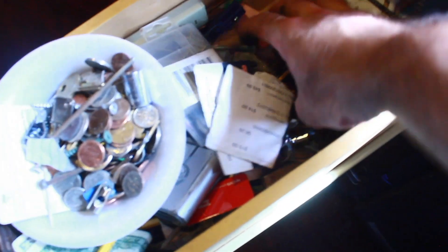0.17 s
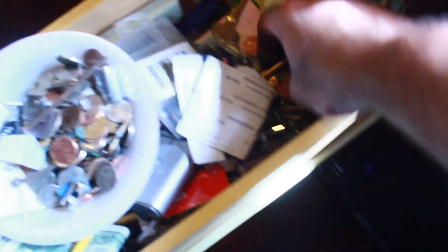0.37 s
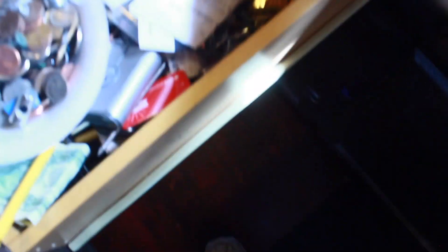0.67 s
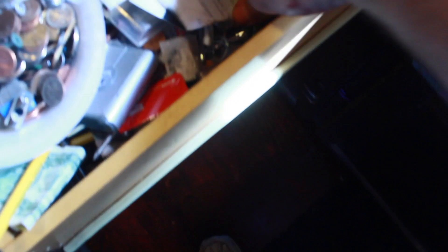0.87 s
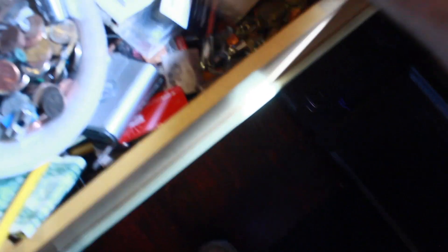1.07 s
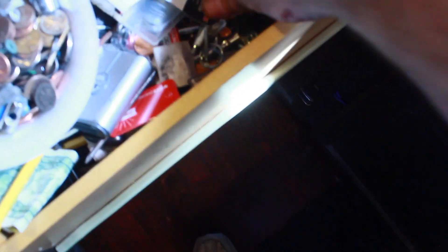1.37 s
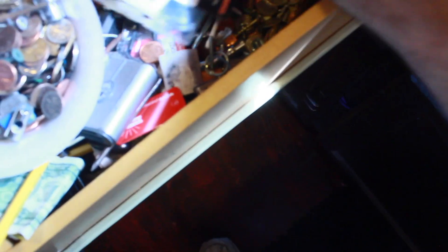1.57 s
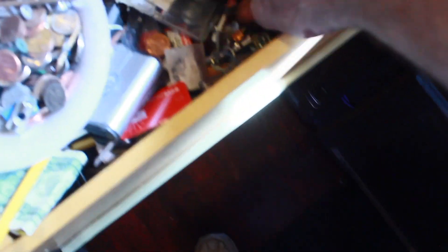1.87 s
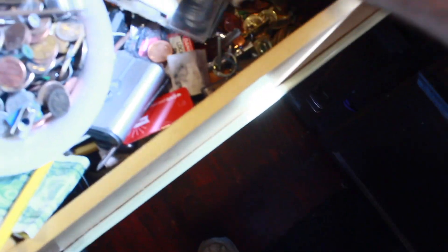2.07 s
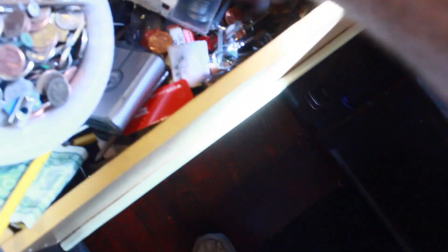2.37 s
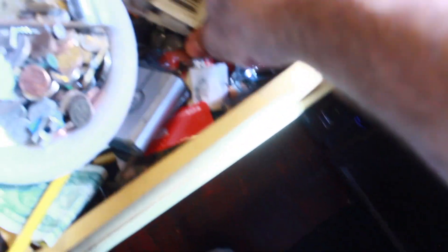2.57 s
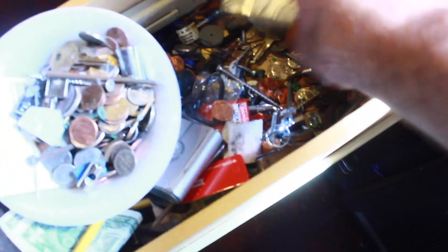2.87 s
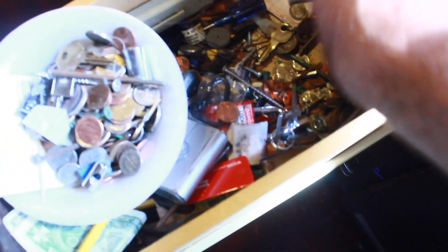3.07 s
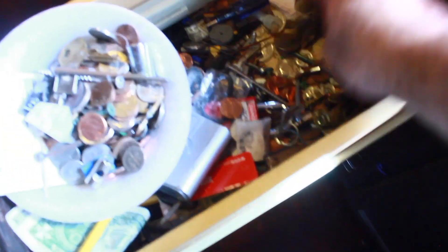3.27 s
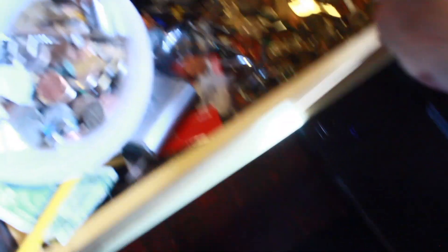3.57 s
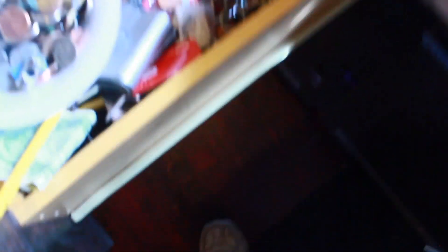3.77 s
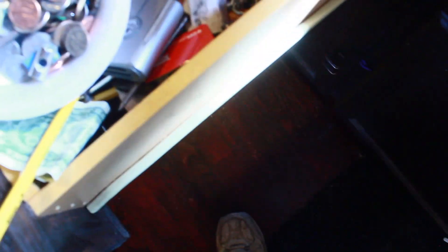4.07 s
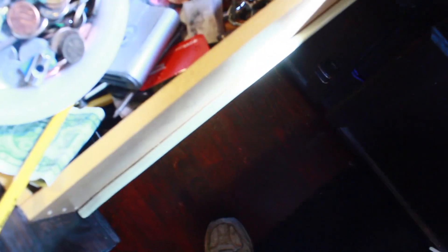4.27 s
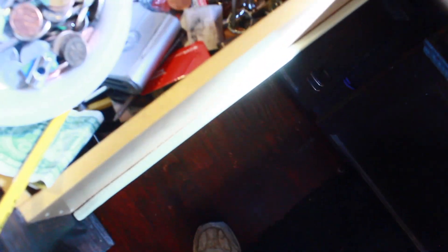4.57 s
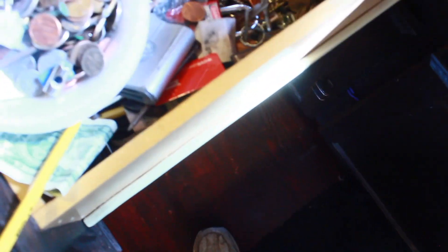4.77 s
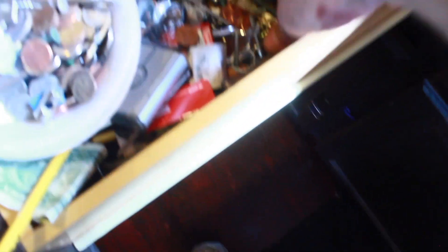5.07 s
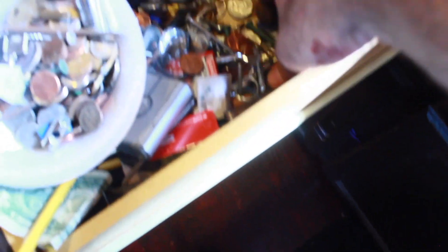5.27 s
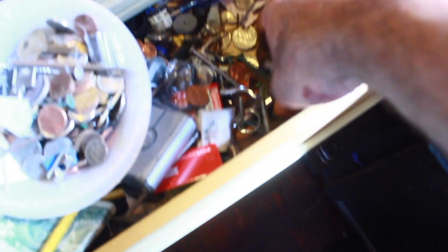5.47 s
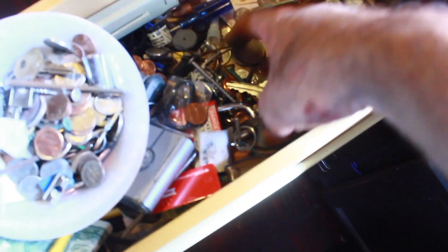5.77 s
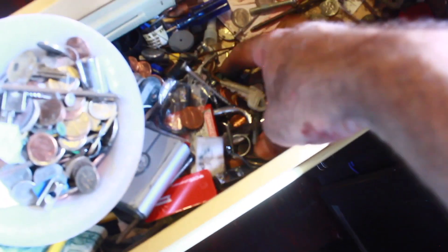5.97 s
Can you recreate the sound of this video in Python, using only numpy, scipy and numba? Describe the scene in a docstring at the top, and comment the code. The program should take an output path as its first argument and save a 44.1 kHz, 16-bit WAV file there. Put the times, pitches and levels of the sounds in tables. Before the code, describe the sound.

Close to the microphone in a small quiet room, a hand digs through a wooden drawer of coins, keys and hardware. Dense, short metallic clatter swells and settles in bursts, with hard clacks, a few dull wooden thuds and thin bright rings. The busiest stretch around three seconds is followed by a near-silent gap, then the rummaging resumes and ends with a small scraping slide and light ticks.

```python
"""In a small, quiet room, a hand rummages through a wooden drawer full of keys, coins and small hardware, close by.
Each push swells, holds and settles: a dense run of short, damped contacts made of quickly fading sine tones.
Noise cracks with short tones make hard clacks, low tones thud on the wood, and pairs of sines ring like loose coins.
One piece drags over the heap with a sinking rasp. Soft echoes and a very faint hush surround it all,
and a suppressor dulls the faintest moments."""
import sys
import numpy as np
from scipy import signal
from scipy.fft import rfft, irfft
from scipy.io import wavfile
from scipy.ndimage import uniform_filter1d
from numba import njit

SR = 44100
rng = np.random.default_rng(int(sys.argv[2]) if len(sys.argv) > 2 else 0)


def master_out(mix):
    """Clip the mix to full scale and print it as 16-bit PCM to the path in sys.argv[1]."""
    frames = np.transpose(np.atleast_2d(mix))
    ceiling = np.clip(frames, -1, 1)
    pcm = np.round(ceiling * 32767).astype(np.int16)
    wavfile.write(sys.argv[1], SR, pcm)


N = 270774
TIME = np.arange(N) / SR  # [s]

# Colour of the quiet room: (frequency [Hz], relative level [dB])
QUIET_COLOUR = [(18, -37), (30, -12), (270, -6), (359, 0), (492, -7), (1050, -10), (1290, -5), (1910, -7),
                (15500, -16.5)]
QUIET_DB = -87.5
# Loose coins and keys that ring out: (time [s], pitch [Hz], relative level [dB], 60 dB decay [s])
RINGS = [(0.052, 5643, -45.5, .11), (.366, 9090, -35, .13), (.395, 12810, -32.5, 0.31),
         (.404, 6620, -35, 0.23), (0.597, 13500, -26, 0.091), (.61, 15140, -30, .14),
         (.676, 15270, -30, .12), (.711, 6500, -24, .04), (0.823, 9450, -38.5, 0.078),
         (.98, 4190, -37.5, .06), (.991, 7930, -36, .05), (1.102, 10800, -30.5, 0.13),
         (1.164, 15260, -25, .17), (1.281, 8500, -35.5, .09), (2.013, 12900, -45.5, 0.028),
         (2.157, 13307, -26, 0.084), (2.164, 14360, -18, 0.058), (2.445, 2920, -28, 0.027),
         (2.488, 9200, -46.5, 0.12), (3.462, 8860, -26, 0.15), (3.469, 14100, -27, .11),
         (3.543, 3140, -26, 0.053), (4.369, 9170, -38, 0.18), (4.5, 15840, -23, 0.13),
         (4.519, 7022, -34, 0.096), (4.807, 15200, -26, 0.32), (4.864, 8930, -32, 0.17),
         (4.865, 12800, -25, 0.16), (4.92, 6540, -34, .11), (5.102, 3910, -24.5, .05),
         (5.173, 14360, -43, .12), (5.175, 12300, -52, 0.2), (5.823, 15410, -27, 0.095),
         (6.032, 4140, -34, 0.027), (6.04, 15500, -34, 0.12), (6.103, 8370, -37, 0.11)]
# Path of a piece dragged over the heap, its rasp falling in pitch: (time [s], pitch [Hz], level [dB])
DRAG = [(5.76, 1810, -41), (5.787, 1500, -35), (5.835, 1050, -34), (5.865, 800, -35), (5.89, 575, -43)]
# Heavier things thudding on the bottom of the drawer: (time [s], pitch [Hz], level [dB])
THUDS = [(.727, 460, -19.5), (.781, 385, -23), (1.19, 590, -16), (2.955, 297.6, -34), (2.992, 361, -24.5),
         (3.516, 435, -24.5)]
# Single hard clacks: (time [s], relative level [dB], main pitch [Hz], brightness of the crack [dB])
CLACKS = [(0.031, -23, 1705, -9), (0.138, -22, 1300, -32), (0.264, -20, 577.3, -15),
          (0.319, -11.5, 614.2, -20), (0.378, -16, 649.4, -22), (0.5, -21, 2310, -8),
          (0.536, -15.5, 1466, 3), (0.562, -16.5, 1479, -4), (0.669, -12, 1470, -17),
          (0.727, -12, 400, -17), (0.74, -18, 734.6, -24), (0.783, -14, 1315, -9),
          (0.816, -22.5, 448.7, -22), (0.874, -24, 1300, -7.5), (0.976, -29, 4150, 12),
          (1.083, -15, 3600, 11), (1.162, -9, 1394, -10), (1.183, -7, 960, 1.5), (1.19, -9, 1300, -14),
          (1.212, -14.5, 1260, -5), (1.443, -39.5, 3984, 7), (1.514, -19.5, 673.4, -25),
          (1.616, -7, 1158, -24), (1.6646, -7.5, 1250, -15), (1.769, -18.5, 2305, -5),
          (1.983, -32, 1698, -8.5), (2.116, -20, 1503, -5), (2.158, -12.5, 2510, 2),
          (2.227, -14.5, 1480, -6), (2.338, -31, 2423, -11), (2.3797, -28, 2990, -5.5),
          (2.391, -32, 2530, -4), (2.447, -35.5, 3000, 4.5), (2.521, -31.5, 1460, -10),
          (2.644, -28, 1400, -15), (2.701, -20, 1274, -2.5), (2.834, -17.5, 797, -6),
          (2.85, -16.5, 627, -18), (2.891, -16.5, 1260, -12), (2.992, -8, 1285, -5.5),
          (3.075, -19.5, 1107, 0), (3.115, -14, 1837, -22), (3.242, -11.5, 1684, -9),
          (3.393, -16.5, 661.5, -17), (3.427, -5, 1691, 3), (3.461, -12, 1437, 9), (3.514, -10.5, 3077, -2),
          (3.54, -11.5, 2910, -17), (3.59, -26.5, 1400, -9), (3.696, -46.5, 3140, -12),
          (4.383, -18, 755.3, -26), (4.476, -13.5, 1483, 0.5), (4.663, -11, 1266, -8),
          (4.772, -12, 1520, -18), (4.784, -10, 4250, -9), (4.864, -19, 1561, 1), (4.934, -16, 1500, -1),
          (4.997, -15.5, 1629, -1), (5.006, -13.5, 1351, -7), (5.104, -16, 1682, -9),
          (5.303, -27, 1880, -1), (5.333, -14, 1073, -10), (5.43, -22, 1152, -3.5), (5.479, -15, 640, -3.5),
          (5.488, -27, 993, -11), (5.567, -14, 3720, -6.5), (5.689, -30, 1774, 1), (5.733, -26.5, 1780, 15),
          (5.96, -20.5, 1332, -38.5), (5.978, -34, 1259, -28), (6.043, -33, 4500, 1)]
# Rough pitches of the metal pieces that keep tinkling in the heap: (pitch [Hz])
METAL_HZ = [2916, 3796, 4246, 4690, 5820, 6450, 6625, 8610, 9090, 9400, 10610, 11160, 12710, 12650, 13860,
            14200, 14830, 14820, 15500, 15820]
# Ringing modes of the drawer: (frequency [Hz], relative level [dB], 60 dB decay [s])
DRAWER_MODES = [(328, 0.5, 0.12), (370, -5, 0.02), (500, 1.5, .1), (615, 0.5, 0.11), (829, -9.5, 0.12),
                (928, -5, .06), (1285, -13, 0.15), (1872, 3, 0.056), (2420, -5.5, .06)]
# Colour of the heap: (frequency [Hz], relative level [dB])
HEAP_COLOUR = [(35, -85), (60, -57.5), (102, -47), (215, -19), (266, -19.5), (376, -0.5), (497, -3),
               (599, 1), (953, -2.5), (1320, 5.5), (2100, -3), (3760, -3), (7900, -20.5), (11700, -26),
               (15500, -22.5)]
# Registers, in order wood, clatter, bright clicks, fine jingle: (low edge [Hz], high edge [Hz])
REGISTER_BANDS = [(90, 800), (800, 2500), (2500, 7000), (7000, 17000)]
# Pushes of the hand: (time [s], swell [s], hold [s], clatter level [dB],
# then relative to the clatter: wood [dB], bright clicks [dB], fine jingle [dB])
PUSHES = [(0.0, 0.0018, 0.048, -44.0, -23, -5.5, -21), (0.069, 0.0098, 0.044, -50.0, -16, -4, -7),
          (0.112, 0.196, 0.12, -31.5, -3.5, -1, -12), (0.453, 0.047, 0.0051, -33.5, -17, -8.5, -12.5),
          (0.521, 0.033, 0.16, -28.5, -10.5, -5, -13), (0.643, 0.092, 0.056, -31.0, 4, -6, -13.5),
          (0.866, 0.007, 0.091, -42.0, -10.5, -3, -13.5), (0.945, 0.06, 0.08, -50.0, -14, 4.5, -9),
          (1.069, 0.022, 0.088, -24.5, -21, -3.0, -13), (1.108, 0.042, 0.086, -29.0, 0.5, -4, -7.5),
          (1.249, 0.018, 0.042, -35.5, -6.5, -0.5, -7), (1.452, 0.147, 0.098, -25.5, -4.5, -3, -11.5),
          (1.694, 0.024, 0.05, -34.0, -1, -2.5, -13), (1.941, 0.039, 0.005, -50.5, -4, -4, -18),
          (2.04, 0.103, 0.063, -33.0, -21.5, 0.5, -14), (2.12, 0.026, 0.011, -31.0, -30, -7, -13),
          (2.209, 0.011, 0.032, -28.0, -6, -9.5, -18), (2.474, 0.0417, 0.0028, -46.0, -22, 0.5, -12.5),
          (2.627, 0.04135, 0.02, -39.5, -9, -8, -22), (2.712, 0.111, 0.18, -39.0, -19, -2, -19.5),
          (2.829, 0.134, 0.061, -29.5, -11.5, -2.5, -15.5), (3.052, 0.039, 0.026, -25.0, -44, -4.5, -19.5),
          (3.144, 0.032, 0.063, -28.5, -23, -4, -19.5), (3.329, 0.099, 0.1, -24.5, -10.5, -1, -14),
          (3.564, 0.045, 0.039, -63.5, -11.5, -4.5, -27.5), (4.322, 0.067, 0.069, -36.0, -20.5, -4, -15),
          (4.359, 0.119, 0.066, -31.5, -8.0, -2, -10.5), (4.588, 0.101, 0.085, -25.0, -4.5, 0, -8.5),
          (4.736, 0.064, 0.1, -32.0, -4, -4, -9.5), (4.884, 0.055, 0.16, -32.5, -9, -4.5, -13.5),
          (5.079, 0.155, 0.025, -49.5, -13, -11, -29), (5.293, 0.0058, 0.04, -33.0, -11.5, -5, -16),
          (5.381, 0.048, 0.079, -38.5, -7, -4, -9.0), (5.551, 0.043, 0.032, -34.5, -11.5, -1, -10),
          (5.69, 0.0767, 0.028, -36.0, -20, -2, -14.5), (5.773, 0.072, 0.033, -33.5, -9.5, -3.5, -12.5),
          (6.001, 0.084, 0.06, -53, -3.5, 4, 2)]
# How long each register settles once the hand stops, in the same order: (60 dB decay [s])
SETTLE_T60_S = [0.12, .16, 0.14, .13]
SWELL_POWER, SETTLE_POWER = 1.8, 1.25  # bend of the swelling and settling curves
TOP_HZ = 15850  # the recorder passes nothing much above this


def undb(db):
    """Turn decibels into a gain."""
    return 10 ** (np.asarray(db) / 20)


def unit(x):
    """Scale to an average (rms) level of 1."""
    return x / np.sqrt(np.mean(x ** 2))


def fade(t, t60):
    """Exponential decay, 60 dB down after t60."""
    return np.exp(-np.log(1000) * t / t60)


def add(out, start, x):
    """Mix x into out from the start time [s] on."""
    first = max(int(start * SR), 0)
    out[first:first + len(x)] += x[:N - first]


def through(x, response):
    """Pass x through an impulse response."""
    return signal.fftconvolve(x, response)[:len(x)]


def response_of(points, size=2048):
    """Make an impulse response of the given colour that never sounds ahead of its cause."""
    hz, db = np.transpose(points)
    grid = np.maximum(np.fft.rfftfreq(size, 1 / SR), 1)
    gain = undb(np.interp(np.log(grid), np.log(hz), db))
    # folding the cepstrum onto positive times gives minimum phase
    cepstrum = irfft(np.log(gain))
    cepstrum[1:size // 2] *= 2
    cepstrum[size // 2 + 1:] = 0
    return irfft(np.exp(rfft(cepstrum)))


def registers(x):
    """Split into wood, clatter, bright clicks and fine jingle."""
    filters = [signal.butter(3, band, "band", fs=SR, output="sos") for band in REGISTER_BANDS]
    return [signal.sosfilt(sos, x + 1e-18) for sos in filters]


def steady(x, span_s=0.061):
    """Even out the level, so the power of a push is shared among the contacts of that moment."""
    power = uniform_filter1d(x ** 2, int(span_s * SR))
    power = uniform_filter1d(power, int(span_s * SR / 2))
    return x / np.sqrt(power + 1e-12)


@njit
def damped_sines(start, hz, t60, size, length):
    """Sum of decaying sines, each with its own start time and cut off after its t60."""
    out = np.zeros(length)
    for k in range(len(start)):
        # each step turns and shrinks a spinning pointer
        pole = np.exp((2j * np.pi * hz[k] - np.log(1000) / t60[k]) / SR)
        pointer, first = size[k] + 0j, int(start[k] * SR)
        for i in range(first, min(first + int(t60[k] * SR), length)):
            out[i] += pointer.imag
            pointer *= pole
    return out


@njit
def resonate(x, hz, width):
    """Band-pass with gain 1 at a centre that may move."""
    out, band_state, low_state = np.empty(len(x)), 0., 0.
    for i in range(len(x)):
        g, damping = np.tan(np.pi * hz[i] / SR), width / hz[i]
        band = (band_state + g * (x[i] + 1e-18 - low_state)) / (1 + g * (g + damping))
        band_state = 2 * band - band_state
        low_state += 2 * g * band
        out[i] = damping * band
    return out


def resonance(x, hz, width_hz):
    """Two band-passes in a row: a resonance with steep sides, at rms 1."""
    centre = hz + np.zeros(len(x))
    once = resonate(x, centre, float(width_hz))
    return unit(resonate(once, centre, float(width_hz)))


def knock(t, hz, cycles):
    """A heavily damped piece: swells to its peak within the given cycles and dies as quickly."""
    age = np.maximum(t, 0) * hz / cycles
    return age * np.exp(1 - age) * np.sin(2 * np.pi * hz * t)


def slips(per_s):
    """Metal sliding on metal: a dense train of tiny, unequal slips."""
    happens = rng.random(N) < per_s / SR
    return unit(rng.standard_normal(N) * happens)


def piece_modes(events, mode_scatter_db=5, t60_scatter=.55, treble_damping=.25, count=9):
    """Pitch, decay and size of the modes of random small pieces lying against each other."""
    shape = (events, count)
    damping, strength = np.clip(rng.standard_normal((2, *shape)), -2, 2)
    place = (np.arange(count) + rng.random(shape)) / count
    hz = 200 * 85 ** place  # spread from 200 Hz to 17 kHz
    t60 = .018 * np.exp(t60_scatter * damping) * (hz / 2000) ** -treble_damping
    sign = np.sign(rng.standard_normal(shape))
    return hz, t60, np.sqrt(hz / t60) * undb(mode_scatter_db * strength) * sign


def on_drawer(x, wood_db=-5):
    """Contacts heard directly and through the ringing drawer, in the colour of the heap."""
    hz, db, t60 = np.array(DRAWER_MODES, float).T.copy()
    # a long-ringing mode starts smaller
    size = undb(db + wood_db) * 2 * np.log(1000) / (t60 * SR)
    boom = damped_sines(0 * hz, hz, t60, size, SR // 8)
    return through(x + through(x, boom), response_of(HEAP_COLOUR))


def hush():
    """The quiet room: very faint coloured noise."""
    return undb(QUIET_DB) * unit(through(rng.standard_normal(N), response_of(QUIET_COLOUR)))


def rings(level_db=-2, twin_db=-7, split_hz=45, attack_s=0.0019):
    """A free coin or key rings; being slightly uneven, it has a close twin mode that beats."""
    out, t = np.zeros(N), np.arange(SR // 2) / SR
    for start, hz, db, t60 in RINGS:
        twin_hz = hz + split_hz * rng.uniform(0.37, 1.5)
        twin = np.sin(2 * np.pi * (twin_hz * t + rng.random()))
        pair = np.sin(2 * np.pi * hz * t) + undb(twin_db) * twin
        shape = fade(t, t60) * np.minimum(t / attack_s, 1)
        add(out, start, undb(db + level_db) * pair * shape)
    return out


def drag(slips_per_s=2500, width_hz=500):
    """Tiny slips excite a resonance that sinks as the piece slides."""
    times, hz, db = np.transpose(DRAG)
    rasp = resonance(slips(slips_per_s), np.interp(TIME, times, hz), width_hz)
    return rasp * np.interp(TIME, times, undb(db), left=0, right=0)


def thuds(cycles=1.6):
    """The loaded drawer bottom answers with a dull, short note."""
    out, t = np.zeros(N), np.arange(SR // 10) / SR
    for start, hz, db in THUDS:
        add(out, start, undb(db) * knock(t, hz, cycles))
    return out


def clack_colour(hz, bright_db, middle_hz=1400, wood_db=-19, wood_db_per_octave=-7, wood_share=.14,
                 clatter_db_per_octave=-6, jingle_db=-22, jingle_share=0.14):
    """Register gains: low pieces and hard blows shake the wood, small ones clatter less, bright cracks jingle."""
    octaves = np.log2(hz / middle_hz)
    wood = wood_db + wood_db_per_octave * octaves + wood_share * bright_db
    clatter = clatter_db_per_octave * max(octaves, 0)
    jingle = jingle_db + jingle_share * bright_db
    return undb([wood, clatter, bright_db, jingle])


def clacks(attack_s=0.0001, crack_t60=.009, modes_db=1, modes_t60=0.07, rattle_db=-21, rattle_t60=0.062,
           tone_db=2, tone_db_per_khz=1, tone_swell_s=.0013, level_db=1.5, bounce_db=-10,
           overtone=1.25, overtone_db=-9):
    """A crack, the short ring of the piece (purer when small), a bounce, and a rattle as its neighbours settle."""
    out, t = np.zeros(N), np.arange(SR // 10) / SR
    noise = rng.standard_normal((len(CLACKS), len(t)))
    since_bounce = t - rng.uniform(.003, 0.0087, (len(CLACKS), 1))
    bounce = undb(bounce_db) * (since_bounce > 0) * fade(np.abs(since_bounce), crack_t60)
    rattle = undb(rattle_db) * fade(t, rattle_t60)
    # every piece has its own handful of modes
    ringing = []
    for hz, t60, size in zip(*piece_modes(len(CLACKS))):
        ringing.append(unit(damped_sines(0 * hz, hz, t60, size, len(t)) * fade(t, modes_t60)))
    cracks = unit(noise * (fade(t, crack_t60) + bounce + rattle)) + undb(modes_db) * np.array(ringing)
    cracks *= np.minimum(t / attack_s, 1)
    body = on_drawer(signal.unit_impulse(len(t)))
    bands = registers(signal.fftconvolve(cracks, body[None], axes=1)[:, :len(t)])
    for k, (start, db, hz, bright_db) in enumerate(CLACKS):
        crack = sum(gain * unit(band[k]) for gain, band in zip(clack_colour(hz, bright_db), bands))
        cycles = max(hz * tone_swell_s, 1.4)
        tone = knock(t, hz, cycles) + undb(overtone_db) * knock(t, overtone * hz, cycles)
        tone += undb(bounce_db) * knock(since_bounce[k], hz, cycles)
        tone_gain = undb(tone_db + tone_db_per_khz * (hz / 1000 - 3.0))
        hit = unit(crack) + tone_gain * unit(tone)
        add(out, start, undb(db + level_db) * hit / np.abs(hit).max())
    return out


def pushes():
    """Level of each register: pushes swell, hold and settle; overlapping ones add in power."""
    power = np.zeros((4, N)) + 1e-14
    for start, swell, hold, db, wood, click, jingle in PUSHES:
        t = np.arange(int((swell + hold + 2 * max(SETTLE_T60_S)) * SR)) / SR
        rise = np.minimum(t / swell, 1) ** SWELL_POWER
        released = np.maximum(t - swell - hold, 0)
        for register, colour, t60 in zip(power, (wood, 0, click, jingle), SETTLE_T60_S):
            settle = fade((released / t60) ** SETTLE_POWER, 1)
            add(register, start, (undb(db + colour) * rise * settle) ** 2)
    return np.sqrt(power)


def contacts(effort_db, per_s=1500, full_db=-27, thinning=.55, spread_db=2.0):
    """Random touches, fewer under a light hand; each rings its own modes, soon damped by the neighbours."""
    start = rng.uniform(0, TIME[-1], int(per_s * N / SR))
    effort = np.interp(start, TIME, effort_db)
    share = np.clip(undb(thinning * (effort - full_db)), .18, 1)
    start = start[rng.random(len(start)) < share]
    hz, t60, size = piece_modes(len(start))
    force = undb(spread_db * np.clip(rng.standard_normal((len(start), 1)), -2, 2))
    starts = np.repeat(start, hz.shape[1])
    return damped_sines(starts, hz.ravel(), t60.ravel(), (force * size).ravel(), N)


def tinkle(per_s=380, spread_db=5, detune=0.0053):
    """Some touches leave a piece free for long enough to sound its own pitch."""
    events = int(per_s * N / SR)
    pitch, force, life = rng.uniform(-1, 1, (events, 3)).T
    hz = rng.choice(METAL_HZ, events) * (1 + detune * pitch)
    t60 = .09 * 2 ** life  # 0.045 to 0.18 s
    start = rng.uniform(0, N / SR, events)
    return unit(damped_sines(start, hz, t60, undb(spread_db * force), N))


def rummage(wood_db=-1, clatter_db=-1, click_db=-0.64, jingle_db=1.78, tinkle_db=-21, light_db=-46,
            hollow_db=-4, hollow_hz=1750, hollow_width_hz=400):
    """The heap slides and clatters as hard as the hand pushes; deep pushes reach the wood."""
    levels = pushes()
    effort_db = 20 * np.log10(levels[1])  # the clatter tells how hard the hand pushes
    # separate touches over a finer rasp of sliding
    rubbing = steady(contacts(effort_db)) + undb(-12) * slips(9000)
    heap = unit(on_drawer(rubbing)) + undb(tinkle_db) * tinkle()
    # light touches have a hollow colour that harder pushes cover
    hollow_gain = undb(hollow_db + np.minimum(effort_db, light_db))
    out = hollow_gain * steady(resonance(heap, hollow_hz, hollow_width_hz))
    gains = undb([wood_db, clatter_db, click_db, jingle_db])
    for band, level, gain in zip(registers(heap), levels, gains):
        out += steady(band) * level * gain
    return out


def room(x, near_db=-11, near_t60=0.13, far_db=-44, far_t60=0.6, dull_hz=3500, gap_s=0.0017):
    """Quick reflections from the drawer and furniture, then a faint, dull tail, made of fading noise."""
    t = np.arange(SR // 2) / SR
    near, far = rng.standard_normal((2, len(t))) * (t > gap_s)
    echoes = undb(near_db) * unit(near * fade(t, near_t60)) + undb(far_db) * unit(far * fade(t, far_t60))
    dulled = signal.lfilter(*signal.butter(1, dull_hz, fs=SR), echoes)
    return x + through(x, dulled / np.sqrt(len(t)))


def scene():
    """The drawer in its room, over a very faint hush."""
    drawer = rings() + drag() + thuds() + clacks() + rummage()
    return (hush() + room(drawer))[None]


def suppress_hiss(x, above_hz=4400, threshold_db=-60, slope=0.39, span_s=0.0047):
    """A noise suppressor turns the treble down whenever it falls under a threshold."""
    treble = signal.sosfiltfilt(signal.butter(4, above_hz, "high", fs=SR, output="sos"), x)
    level = np.sqrt(np.abs(uniform_filter1d(treble ** 2, int(span_s * SR))))
    gain = np.clip((level / undb(threshold_db)) ** slope, .25, 1)  # never below a quarter
    return x + (gain - 1) * treble


def record(dry, low_cut_hz=115):
    """The small microphone loses the bass; the recorder holds down faint hiss and cuts the top steeply."""
    thin = signal.sosfilt(signal.butter(3, low_cut_hz, "high", fs=SR, output="sos"), dry)
    top_cut = signal.ellip(10, .2, 85, TOP_HZ, fs=SR, output="sos")
    return signal.sosfilt(top_cut, suppress_hiss(thin))


dry = scene()
out = record(dry)
master_out(out)
```